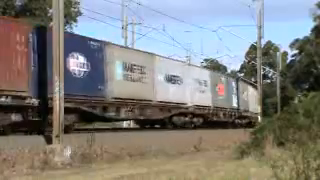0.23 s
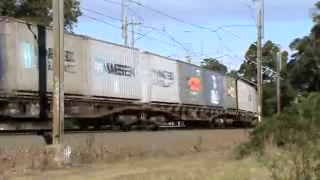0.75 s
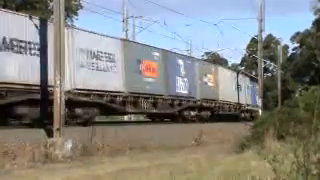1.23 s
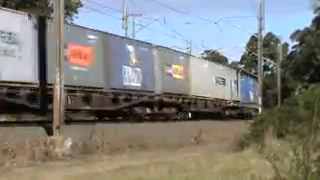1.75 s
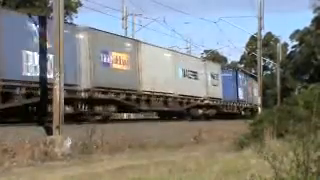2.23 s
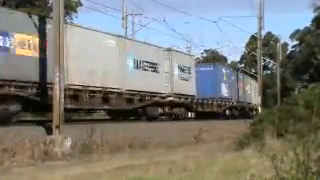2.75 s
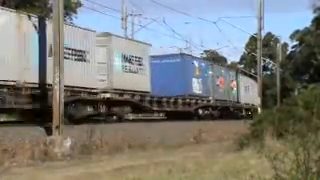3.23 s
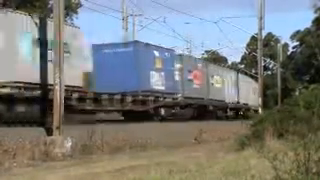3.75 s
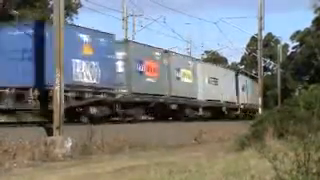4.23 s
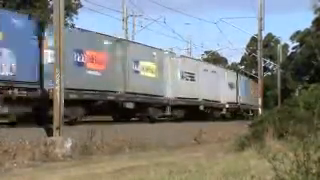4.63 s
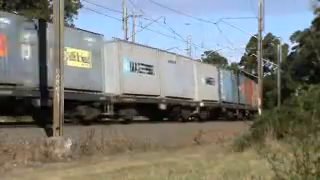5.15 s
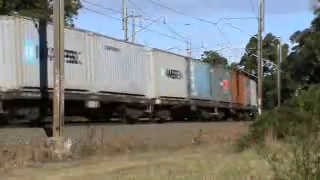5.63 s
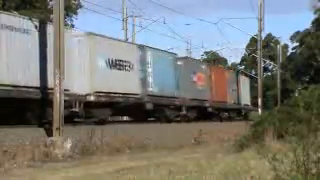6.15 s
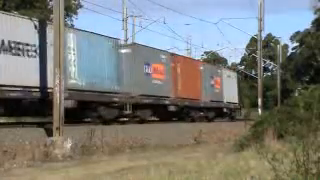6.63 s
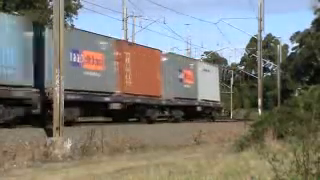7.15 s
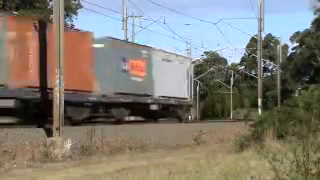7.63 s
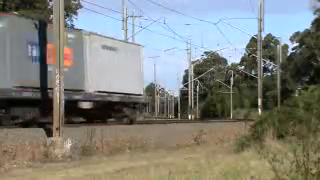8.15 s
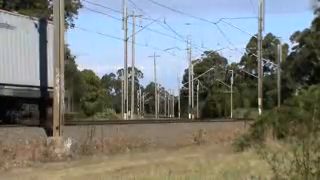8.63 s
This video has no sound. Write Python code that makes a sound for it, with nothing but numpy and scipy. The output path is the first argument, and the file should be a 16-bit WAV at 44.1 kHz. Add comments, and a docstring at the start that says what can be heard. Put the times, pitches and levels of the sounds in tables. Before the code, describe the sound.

Heard from the lineside in the open, container wagons roll by at speed. Thin, metallic squeals ring continuously, beating and sliding down in pitch as each wheel passes, within a diffuse haze reflected from trees. A hooting wheel howl, two octaves lower with rough overtones, dominates the opening seconds. Rumble, rushing rail noise, flange hiss and a few soft thuds lie beneath. Later the howl is gone and several strong squeals overlap until the cut.

```python
"""High wheel squeals ring out first, in a haze of scattered tone, above wagon rumble and rail roar.
A container train rolls past at line speed in front of tall trees, about twenty metres from the microphone.
Stick-slip keeps the wheel modes ringing: each glides down in pitch as it goes by (Doppler), one howls two
octaves lower. The trees smear the tones; banded noise makes the rolling, axle knocks and flange rubs."""
import sys
import numpy as np
from scipy import signal
from scipy.io import wavfile
from scipy.ndimage import uniform_filter1d

SR = 44100
rng = np.random.default_rng(int(sys.argv[2]) if len(sys.argv) > 2 else 0)


def materialize(psi):
    """Save the field psi as 16-bit PCM at rate SR to the path in sys.argv[1].

    A 1-D psi becomes a single channel; in a 2-D psi each row is a channel.
    """
    bounded = np.clip(np.atleast_2d(psi).T, -1, 1)
    quanta = np.round(bounded * 32767).astype(np.int16)
    wavfile.write(sys.argv[1], SR, quanta)


N = 392483
TIME = np.arange(N) / SR   # s
SPEED, TRACK_DISTANCE, SOUND_SPEED = 19.0, 19.0, 343.0   # m/s, m, m/s


def from_db(db):
    """Decibels to gain."""
    return 10 ** (np.asarray(db) / 20)


def rms_one(x):
    """Scale to unit power."""
    return x / np.sqrt(np.mean(np.abs(x) ** 2) + 1e-20)


def in_time(rows):
    """One curve over time for each column of a table after the first."""
    s, *columns = np.transpose(rows)
    return [np.interp(TIME, s, c) for c in columns]


def at_hz(points, hz):
    """Read a spectrum on a log-frequency axis."""
    table_hz, values = np.array(points).T
    return np.interp(np.log(hz), np.log(table_hz), values)


def drift(rate_hz):
    """Slow chance with spread 1: twice-smoothed noise, drawn every 40 samples."""
    r = np.exp(-80 * np.pi * rate_hz / SR)
    white = rng.standard_normal(N // 40 + 2002)
    slow = signal.lfilter([1], [1, -2 * r, r * r], white)[2000:]   # drop the filter's start
    return np.interp(np.arange(N) / 40, np.arange(len(slow)), rms_one(slow))


def bout(start, length, attack, release):
    """Envelope that rises, holds and dies away (all in s)."""
    age = TIME - start
    return np.clip(age / attack, 0, 1) * np.exp(-np.maximum(age - length, 0) / release)


def swell(s, half_length):
    """Bell-shaped envelope around a moment."""
    return np.exp(-((TIME - s) / half_length) ** 2)


def stereo(mid, side, alike):
    """Left and right with a given likeness."""
    alike = np.clip(alike, 0, .999)
    shared = np.sqrt((1 + alike) / 2) * mid
    return shared + np.sqrt((1 - alike) / 2) * side * np.array([[1], [-1]])


def turning(hz):
    """Unit phasor that follows a pitch."""
    cycles = np.cumsum(hz + np.zeros(N)) / SR % 1
    angle = (2 * np.pi * cycles).astype(np.float32)
    return np.cos(angle) + 1j * np.sin(angle)


def blur(width_hz, order=2):
    """Random amplitude and phase of many paths added up; power 1."""
    step = 8   # samples between random values
    size = N // step + 4002
    white = rng.standard_normal(size) + 1j * rng.standard_normal(size)
    lowpass = signal.butter(order, min(width_hz / 2, 2000), fs=SR / step, output="sos")
    slow = signal.sosfilt(lowpass, white)[4000:]
    smooth = np.interp(np.arange(N) / step, np.arange(len(slow)), rms_one(slow))
    return uniform_filter1d(smooth, step)


def diffuse_tone(hz, width_hz, alike, order=2):
    """A tone that arrives by many paths, each with its own Doppler shift; stereo, rms 1."""
    carrier = np.sqrt(2) * turning(hz)
    mid = (carrier * blur(width_hz, order)).real
    side = (carrier * blur(width_hz, order)).real
    return stereo(mid, side, alike)


def doppler(abreast):
    """Pitch factor of a passing wheel: high while it nears, low as it leaves."""
    along = SPEED * (TIME - abreast)
    return 1 - SPEED / SOUND_SPEED * along / np.hypot(along, TRACK_DISTANCE)


def wheel_tone(hz, waver_hz, flutter, flutter_hz, beating=1):
    """A wavering tone, as of a wheel mode kept ringing by stick-slip; near reflections beat with it."""
    paths = (1 + flutter * blur(flutter_hz)) / np.hypot(1, flutter)
    return np.sqrt(2) * (turning(hz + waver_hz * drift(8.0)) * beating * paths).real


# likeness of left and right in the noise, wide in the middle, central in bass and treble:
# (frequency [Hz], likeness [0-1])
NOISE_LIKENESS = [(30, 1), (70, 1), (140, 0.97), (300, 0.85), (600, 0.77), (1200, 0.78), (2500, 1),
                  (6000, 1), (13000, 1)]


def banded_noise(colour, patchy_db):
    """Half-octave bands of stereo noise, each flickering partly on its own; rms 1."""
    low, high = colour[0][0], min(colour[-1][0], .45 * SR)
    edges = np.geomspace(low, high, int(2 * np.log2(high / low)) + 2)
    out, together, white = 0, drift(5.2), rng.standard_normal((2, 2, N))
    for k, band in enumerate(zip(edges, edges[1:])):
        bandpass = signal.butter(2, band, "band", fs=SR, output="sos")
        mid, side = signal.sosfilt(bandpass, white[k % 2])   # neighbours use different noise
        hz = np.sqrt(band[0] * band[1])
        gain = from_db(at_hz(colour, hz) + patchy_db * (0.22 * together + drift(12.7)))
        out = out + gain * stereo(mid, side, at_hz(NOISE_LIKENESS, hz))
    return rms_one(out)


# the train rolling along the line, levels before each layer's trim:
# (time [s], wagon rumble [dB], running-gear drone [dB], rail roar [dB], wheel rush [dB])
ROLLING_LEVELS = [(0.1, -35.5, -44, -36, -40), (0.15, -34.5, -46, -34.5, -39), (0.75, -35.5, -28, -32, -36),
                  (1.12, -36.5, -31, -34.5, -34), (1.31, -34, -30, -31.5, -38), (1.7, -39, -32, -37, -34),
                  (1.72, -40.5, -38, -36, -36.5), (2.21, -33, -41, -33, -34.5),
                  (2.33, -35.5, -34, -33.5, -35), (3.61, -35, -29, -32, -36), (3.73, -37, -25, -34, -39),
                  (4.27, -33, -33, -31, -35.5), (5.02, -40.5, -31.5, -41, -42.5),
                  (5.14, -34, -27.5, -35.5, -38.5), (5.33, -40.5, -31.5, -41, -42),
                  (6.42, -42.5, -36.5, -38.5, -43), (8.48, -40, -31.5, -34, -36.5),
                  (8.8, -38.5, -27.5, -33, -34)]
# drones of the running gear: (frequency [Hz], width [Hz], level relative to the drone column [dB])
GEAR_DRONES = [(194, 33, -9), (389, 46, -7.5)]
# flanges rubbing on the rail: (time [s], hiss level [dB], half length [s])
FLANGE_RUBS = [(.1, -57, 0.21), (0.687, -43, 0.47), (1.487, -45.5, 0.23), (2.169, -45.5, 0.18),
               (5.05, -52.5, 0.32), (8.859, -46, 0.089)]
HISS_DB = -53   # hiss level between the rubs
# colours of wagons, rails, wheels and flanges: (frequency [Hz], relative density [dB per Hz])
WAGON_COLOUR = [(18, -14.5), (30, 1), (42, -1.5), (54, 2), (72, -1.5), (95, 4), (130, 0), (190, 1.5),
                (250, 2.5), (320, -10.5), (450, -12.5)]
RAIL_COLOUR = [(200, -4), (310, -4), (400, -8), (500, -0.5), (680, -4), (900, -2), (1300, -7.5),
               (1700, -8.5), (2600, -11)]
WHEEL_COLOUR = [(1000, -3), (1500, 0), (2000, 12), (2400, 12.5), (3000, 11), (3600, -12), (4300, -13.5),
                (5300, -36), (6500, -47)]
FLANGE_COLOUR = [(5000, -8.5), (7000, -14), (9200, 10), (11500, 29), (13000, 16.5), (16000, 11.5)]


def rolling():
    """Rough wheels on rough rail shake the wagons (low), the rails (middle) and the wheels (high)."""
    rumble_db, drone_db, roar_db, rush_db = in_time(ROLLING_LEVELS)
    rumble = from_db(rumble_db + 4.5) * banded_noise(WAGON_COLOUR, patchy_db=1.0)
    drones = sum(from_db(drone_db + db) * diffuse_tone(hz, width, alike=0.9)
                 for hz, width, db in GEAR_DRONES)
    roar = from_db(roar_db + 4.0) * banded_noise(RAIL_COLOUR, patchy_db=1.4)
    rush = from_db(rush_db + 3.0) * banded_noise(WHEEL_COLOUR, patchy_db=1.75)
    rubs = sum(from_db(db) * swell(s, length) for s, db, length in FLANGE_RUBS)
    hiss = np.hypot(from_db(HISS_DB), rubs) * banded_noise(FLANGE_COLOUR, patchy_db=3.0)
    # rumble leans right, roar leans left
    return rumble * from_db([[-.8], [.8]]) + drones + roar * from_db([[1.1], [-1.1]]) + rush + hiss


# dull axle knocks: (time [s], level before the rise and decay shape it [dB])
AXLE_KNOCKS = [(.4, -25), (.515, -22.5), (.555, -30), (.672, -20.5), (.728, -46), (0.801, -21.5),
               (0.97, -24), (1.15, -27), (2.78, -28), (3.7, -22), (3.868, -23.5), (5.09, -31), (5.16, -40)]
KNOCK_RISE_S, KNOCK_DECAY_S = 0.0036, 0.05
# boom of the wagon frame: (frequency [Hz], relative density [dB per Hz])
FRAME_COLOUR = [(60, -20), (190, -1), (380, -0.5), (650, -2), (1100, -9), (2500, -11)]


def knocks():
    """An axle drops over a rail flaw and the wagon frame booms briefly."""
    blows = 0
    for s, db in AXLE_KNOCKS:
        age = np.maximum(TIME - s, 0)
        shape = (1 - np.exp(-age / KNOCK_RISE_S)) * np.exp(-age / KNOCK_DECAY_S)
        blows = blows + from_db(db) * shape
    return blows * banded_noise(FRAME_COLOUR, patchy_db=1.5)


# squeals scattered by trees and wagons, main level before the trims of its parts:
# (time [s], centre [Hz], level [dB], level of wheels far up the line [dB])
SCATTERED_SQUEALS = [(0, 5274, -22.5, -31), (.5, 5242, -21.5, -30), (1.3, 5070, -23.5, -35),
                     (1.8, 4930, -32.5, -43), (2.3, 4937, -24, -48), (3.2, 4750, -25.5, -36.5),
                     (3.75, 4667, -20.5, -41.5), (4.7, 4733, -20.5, -36), (5.05, 4830, -20, -31),
                     (5.45, 4970, -22, -33.5), (6.5, 5060, -16.5, -31), (7.5, 4980, -16, -36),
                     (8.3, 4918, -18.5, -33.5), (8.9, 4840, -19.5, -39)]
# two higher wheel modes, ringing diffusely, levels before flicker:
# (time [s], pitch of the lower [Hz], lower mode level [dB], upper mode level [dB])
HIGHER_MODES = [(0, 6580, -41, -53), (.35, 6430, -27, -53), (.7, 6430, -44, -56), (1.2, 6500, -53, -55),
                (1.6, 6410, -56, -54.5), (2.6, 6477, -61, -53), (3.2, 6470, -51, -67),
                (4.1, 6520, -54, -77), (4.5, 6320, -81, -68.5), (8.9, 6340, -82, -79)]
HIGH_FLICKER_DB, HIGH_FLICKER_HZ = 3.5, 7   # the higher modes come and go


def haze():
    """The squeals come back from the trees smeared in pitch, with higher wheel modes above them."""
    centre_hz, level_db, nearing_db = in_time(SCATTERED_SQUEALS)
    lower_hz, lower_db, upper_db = in_time(HIGHER_MODES)
    core = from_db(level_db - 6.5) * diffuse_tone(centre_hz, width_hz=377, alike=1.0, order=3)
    skirt = from_db(level_db - 6.5) * diffuse_tone(centre_hz + 20, width_hz=910, alike=1.0, order=5)
    # wheels still far up the line are all shifted sharp, those long gone are flat
    nearing_hz = 5380 + 0.24 * (centre_hz - 4950)
    nearing = from_db(nearing_db) * diffuse_tone(nearing_hz, width_hz=520, alike=1.0, order=6)
    leaving = from_db(level_db - 15.0) * diffuse_tone(centre_hz - 470, width_hz=930, alike=1.0, order=3)
    lower = diffuse_tone(lower_hz, width_hz=160, alike=0.89, order=3)
    lower = lower + from_db(-12) * diffuse_tone(lower_hz - 200, width_hz=700, alike=0.63, order=4)
    upper = diffuse_tone(8150, width_hz=380, alike=0.92, order=3)
    high = sum(from_db(db + HIGH_FLICKER_DB * drift(HIGH_FLICKER_HZ)) * mode
               for db, mode in ((lower_db, lower), (upper_db, upper)))
    return core + skirt + nearing + leaving + high


# brief faint high chirps: (time [s], pitch [Hz], level [dB], half length [s])
HIGH_CHIRPS = [(0.085, 8380, -42, .04), (0.26, 8160, -41, 0.067), (.63, 8320, -41, .07),
               (.7, 7950, -42, 0.059), (1.05, 8200, -52, 0.064), (1.3, 8140, -44, 0.07),
               (3.1, 6440, -45, .06), (3.822, 6400, -53, .04), (3.938, 6400, -44, 0.022),
               (4.12, 6560, -49, .05), (4.72, 6400, -46, 0.04), (5.149, 6880, -51, 0.063),
               (5.083, 8100, -46, 0.12), (5.23, 7730, -47, 0.038), (8.527, 6280, -41, 0.05),
               (8.54, 7330, -44, 0.055), (8.54, 8350, -47, 0.072)]


def chirps():
    """Short thin high tones flicker in and out."""
    return sum(from_db(db) * swell(s, length) * wheel_tone(hz, waver_hz=25.7, flutter=0.54, flutter_hz=120)
               for s, hz, db, length in HIGH_CHIRPS)


# scraping of the howling wheel's flange, before flicker: (time [s], level [dB])
GRINDING_LEVEL = [(0, -52), (.5, -50), (1.0, -40), (1.6, -41), (2.6, -45.5), (3.3, -48), (4.3, -70.5),
                  (8.9, -85.5)]
# that wheel's other modes: (frequency [Hz], width [Hz], level relative to the grinding [dB])
GRINDING_MODES = [(3980, 300, 0), (5330, 350, 2), (5830, 190, -6.5), (6580, 180, -10.5)]


def grinding():
    """The flange of the howling wheel scrapes the rail; each of the other modes flares up on its own."""
    level_db, = in_time(GRINDING_LEVEL)
    out = 0
    for hz, width, db in GRINDING_MODES:
        gain = from_db(level_db + db + HIGH_FLICKER_DB * drift(HIGH_FLICKER_HZ))
        out = out + gain * diffuse_tone(hz, width, alike=1.0, order=3)
    return out


HOWL_HZ, HOWL_ABREAST = 1088, 1.96   # the wheel's own pitch, moment abreast of the microphone (s)
# direction of the howl: (time [s], left minus right [dB])
HOWL_DIRECTION = [(0, -5), (.8, 0), (1.5, 0.5), (2, 0.5), (2.45, 7), (3.1, 7), (3.6, 2), (4.8, 4.5),
                  (6, 0.5)]
# bouts of the howl, overtones before bursts and the level of each harmonic:
# (start [s], length [s], direct tone [dB], scattered sound [dB], overtones [dB])
HOWL_BOUTS = [(0.0, 0.12, -28.5, -33.5, -43), (0.194, .18, -41, -31, -49), (0.39, 0.11, -24.5, -29, -39),
              (0.596, 0.1, -26, -25, -38), (0.798, 0.35, -17.5, -21.5, -31), (1.075, 0.31, -18, -20, -30.5),
              (1.412, 0.32, -11, -20, -30.5), (1.798, 0.37, -15.5, -19.5, -31),
              (2.259, 0.3, -16.5, -22, -30), (2.599, 0.18, -17, -23.5, -29), (2.83, 0.042, -18, -18.5, -33),
              (2.955, 0.16, -19, -22.5, -29), (3.196, 0.42, -30.5, -28, -33),
              (4.176, 0.45, -33.5, -29.5, -36.5), (4.703, 0.47, -32.5, -35.5, -52),
              (5.443, 0.88, -42, -41, -50)]
# the wheel slips and barks in its overtones: (time [s], level before that of each harmonic [dB], half length [s])
OVERTONE_BARKS = [(1.785, -26, 0.04), (2.27, -26, 0.047), (2.45, -23, 0.045), (2.526, -25.5, 0.051),
                  (2.895, -24.5, 0.038), (3.15, -30, 0.037)]
HOWL_ATTACK_S, HOWL_RELEASE_S, ECHO_RELEASE_S = 0.03, 0.073, 0.4
RASP_BURST_DB, RASP_BURSTS_HZ = 1.5, 16   # the overtones come unevenly
HOWL_FLUTTER, HOWL_FLUTTER_HZ, FULL_HOWL_DB = .48, 80, -15   # it flutters until loud enough to lock
HOWL_SAG_S, HOWL_SAG_HZ, HOWL_SAG_HALF_S = 2.86, 13, .06   # once its pitch sags for a moment


def howl():
    """The low wheel mode, its scattered sound and its rough second and third harmonics."""
    tone = echo = rasp = 0
    for start, length, tone_db, echo_db, rasp_db in HOWL_BOUTS:
        grip = bout(start, length, HOWL_ATTACK_S, HOWL_RELEASE_S)
        lingering = bout(start, length, HOWL_ATTACK_S, ECHO_RELEASE_S)
        tone = np.maximum(tone, from_db(tone_db) * grip)
        echo = np.maximum(echo, from_db(echo_db) * lingering)
        rasp = np.maximum(rasp, from_db(rasp_db) * lingering)
    pitch = HOWL_HZ * doppler(HOWL_ABREAST) - HOWL_SAG_HZ * swell(HOWL_SAG_S, HOWL_SAG_HALF_S)
    loose = 1 / (1 + (tone / from_db(FULL_HOWL_DB)) ** 4)
    direct = tone * wheel_tone(pitch, waver_hz=1.0, flutter=HOWL_FLUTTER * loose, flutter_hz=HOWL_FLUTTER_HZ)
    # echoes come from all along the track, so they keep only part of the shift
    echo_pitch = HOWL_HZ + .7 * (pitch - HOWL_HZ)
    scattered = echo * diffuse_tone(echo_pitch, width_hz=109, alike=.15, order=3)
    second = from_db(-1.0) * diffuse_tone(2 * echo_pitch, width_hz=154, alike=0.86)
    second = second + from_db(-4.5) * diffuse_tone(2 * echo_pitch, width_hz=370, alike=0.84, order=3)
    third = from_db(-6.5) * diffuse_tone(3 * echo_pitch + 25, width_hz=220, alike=1.0)
    pan = from_db(in_time(HOWL_DIRECTION)[0] * np.array([[.5], [-.5]]))
    pan = pan / pan.mean(axis=0)
    barks = sum(from_db(db) * swell(s, length) for s, db, length in OVERTONE_BARKS)
    bursts = rasp * from_db(RASP_BURST_DB * drift(RASP_BURSTS_HZ))
    overtones = np.hypot(bursts, barks) * (second + third)
    return (direct + scattered) * pan + overtones * pan ** 0.47   # overtones lean less to the side


WHEEL_TURNS_HZ, NODAL_DIAMETERS = 6.5, 2   # turning splits a wheel mode into two waves that beat
BACKWARD_WAVE_DB, BACKWARD_SWING_DB, BACKWARD_SWING_HZ = -10, 5.5, 3   # this wave comes and goes
SPLIT_WANDER, SPLIT_WANDER_HZ = .45, 3   # the beat wanders as the contact shifts (share of its rate)


def split_mode():
    """Waves run both ways round a turning wheel, one a little sharp, one flat; power 1."""
    split_hz = NODAL_DIAMETERS * WHEEL_TURNS_HZ
    beat = turning(2 * split_hz * (1 + SPLIT_WANDER * drift(SPLIT_WANDER_HZ)))
    backward = from_db(BACKWARD_WAVE_DB + BACKWARD_SWING_DB * drift(BACKWARD_SWING_HZ))
    return turning(split_hz / 2) * (1 + backward / beat) / np.hypot(1, backward)


# squealing wheel modes: (own pitch [Hz], moment abreast of the microphone [s])
WHEEL_MODES = [(5140, .58), (6572, -.16), (4898, 2.05), (4365, 2.82), (4459, 4.16), (4519, 5.25),
               (4906, 6.46), (5023, 6.96), (4935, 6.98), (4932, 7.64), (4920, 8.52), (5234, 9.34),
               (6428, -1.5), (5095, -2.5), (6850, 2.05), (7855, 2.05), (7990, 2.82)]
# bouts, one list for each wheel mode in the same order: (start [s], length [s], level as if abreast [dB])
SQUEAL_BOUTS = [
    [(-.2, 0.37, -13.5), (.2, 0.24, -15), (.51, 0.14, -21), (.71, 0.16, -23), (.88, 0.17, -34),
     (1.08, 0.53, -25.5), (1.5, 0.52, -27.5), (2.05, 0.26, -23), (2.4, 1, -30)],
    [(.06, 0.25, -28), (.44, 0.12, -25), (.72, .24, -28.5), (1.09, 0.2, -23.5), (1.4, 2.6, -40.5)],
    [(.9, 0.3, -29), (1.2, 0.21, -24), (1.5, 0.25, -30.5)],
    [(1.9, 0.37, -32), (2.2, 0.3, -28), (2.48, 0.15, -25), (2.7, 0.28, -30.5), (3.0, 0.28, -31.5)],
    [(3.34, .16, -21.5), (3.6, 0.087, -18), (3.76, 0.25, -16.5), (4.05, 0.16, -27.5), (4.28, 0.17, -36)],
    [(3.65, 0.73, -27), (4.15, 0.25, -18), (4.38, 0.2, -15), (4.72, 0.15, -19.5), (4.97, 0.18, -23.5),
     (5.2, 0.47, -29), (5.7, 0.82, -33.5), (6.6, 1.48, -32.5)],
    [(3.7, 1.3, -24), (4.7, .5, -25.5), (5.26, 0.14, -12), (5.45, 0.43, -13.5), (5.8, 0.47, -17),
     (6.58, 0.89, -21), (7.6, 2.1, -24)],
    [(4.7, 0.73, -26), (5.62, 0.16, -18), (5.75, 0.53, -15), (6.3, 0.41, -15.5), (6.68, 0.15, -14),
     (6.88, .7, -21.5), (7.6, 0.7, -22.5)],
    [(5.9, 0.42, -25.5), (6.27, 0.26, -16.5), (6.6, 0.25, -28)],
    [(6.7, 0.55, -19), (7.2, 0.42, -17.5), (7.6, 0.77, -25)],
    [(7.33, 0.19, -19.5), (7.57, 0.16, -16), (7.8, 0.2, -12), (8.09, 0.27, -17), (8.45, 0.87, -23.5)],
    [(8.1, 0.22, -29.5), (8.38, 0.36, -30.5), (8.68, .3, -24.5)],
    [(-.2, 3.4, -27), (1.7, 1, -46)],
    [(-.2, 1.0, -23.5), (.8, 0.87, -22)],
    [(1.55, 0.47, -51), (2.05, .35, -49)],
    [(1.55, .25, -47), (1.83, 0.23, -45), (2.1, 0.27, -48)],
    [(2.08, 0.32, -46), (2.5, 0.34, -53)],
]
SQUEAL_ATTACK_S, SQUEAL_RELEASE_S = 0.029, 0.09
FULL_SQUEAL_DB = -21   # above this level a wheel locks into a steadier tone
SQUEAL_FLUTTER, SINGING_FLUTTER = .12, .5   # faint singing is more broken than a full squeal


def squeals():
    """Each wheel sings its own high mode in bouts, a beating pair of tones that glides down as it passes."""
    out = 0
    for (hz, abreast), bouts in zip(WHEEL_MODES, SQUEAL_BOUTS):
        level = np.max([from_db(db) * bout(start, length, SQUEAL_ATTACK_S, SQUEAL_RELEASE_S)
                        for start, length, db in bouts], axis=0)
        nearness = TRACK_DISTANCE / np.hypot(SPEED * (TIME - abreast), TRACK_DISTANCE)
        faint = 1 / (1 + (level / from_db(FULL_SQUEAL_DB)) ** 2)
        flutter = SQUEAL_FLUTTER + SINGING_FLUTTER * faint
        tone = wheel_tone(hz * doppler(abreast), waver_hz=3.0, flutter=flutter, flutter_hz=66.0,
                          beating=split_mode())
        out = out + level * nearness * tone
    return out


def scene():
    """Everything heard at the microphone, from the rolling bed up to the squeals."""
    return rolling() + knocks() + haze() + chirps() + grinding() + howl() + squeals()


LIMIT_DB, LIMIT_ATTACK_S, LIMIT_RELEASE_DB_PER_S = -6, 0.0013, 54   # the recorder's gain control
CUTOFF_HZ = 15800


def gain_control(x):
    """Turns everything down quickly on a peak and lets it back up slowly."""
    over = np.maximum(20 * np.log10(np.abs(x).max(axis=0) + 1e-9) - LIMIT_DB, 0)
    ramp = LIMIT_RELEASE_DB_PER_S * TIME
    held = np.maximum.accumulate(over + ramp) - ramp   # falls back at the release rate
    r = np.exp(-1 / (LIMIT_ATTACK_S * SR))
    return x * from_db(-signal.lfilter([1 - r], [1, -r], held))


def record(dry):
    """Gain control holds the peaks down, the ends are eased over 3 ms and the top is cut steeply."""
    ease = np.clip(np.minimum(TIME, TIME[-1] - TIME) / .003, 0, 1)
    levelled = gain_control(from_db(.5) * dry) * ease
    return signal.sosfilt(signal.ellip(10, .1, 80, CUTOFF_HZ, fs=SR, output="sos"), levelled)


dry = scene()
out = record(dry)
materialize(out)
```